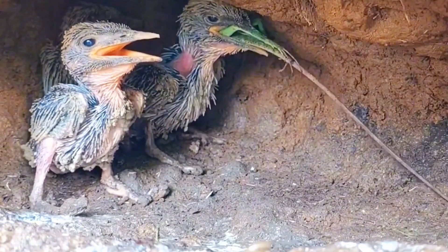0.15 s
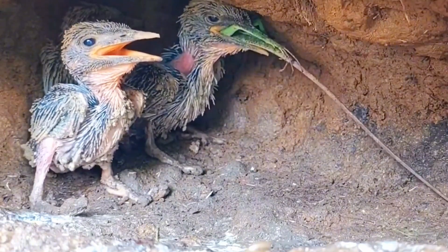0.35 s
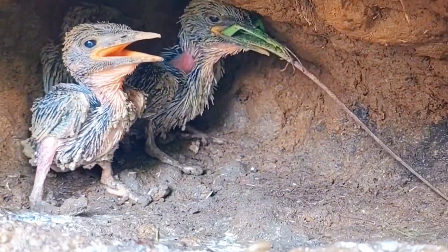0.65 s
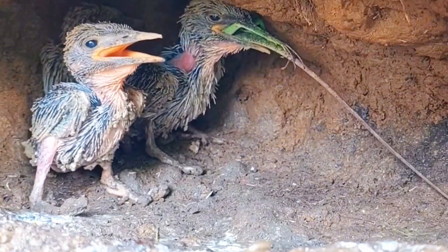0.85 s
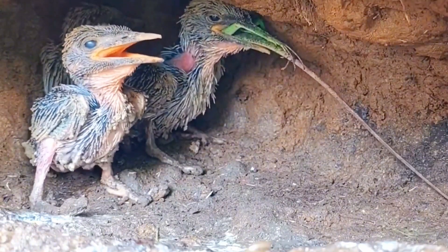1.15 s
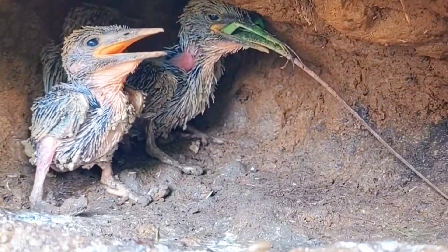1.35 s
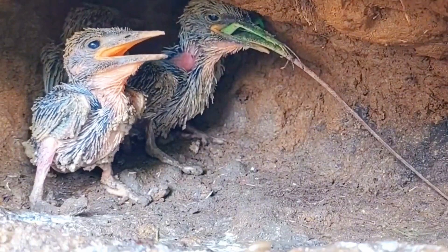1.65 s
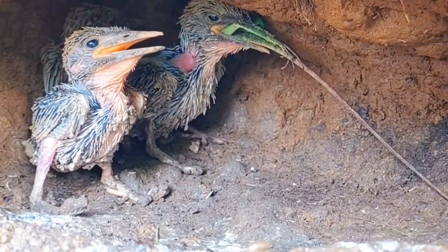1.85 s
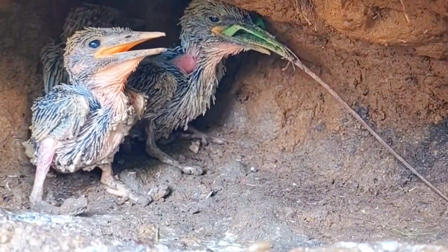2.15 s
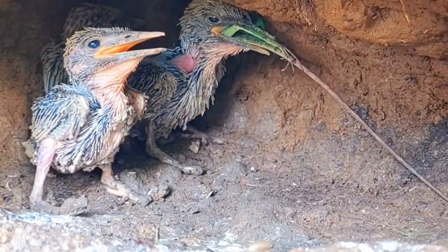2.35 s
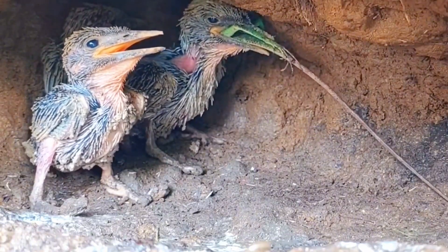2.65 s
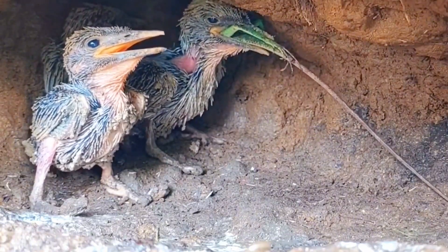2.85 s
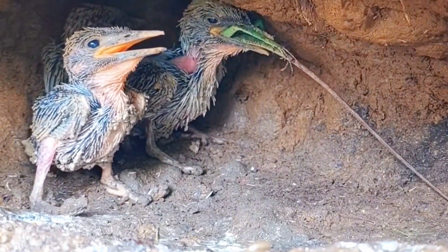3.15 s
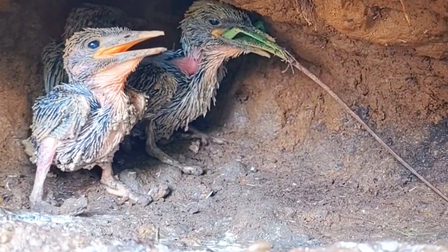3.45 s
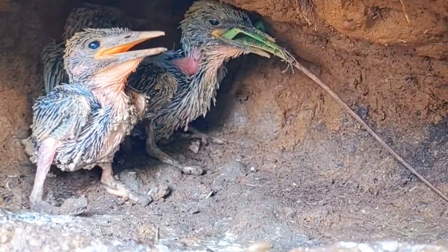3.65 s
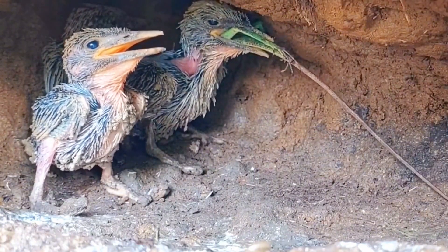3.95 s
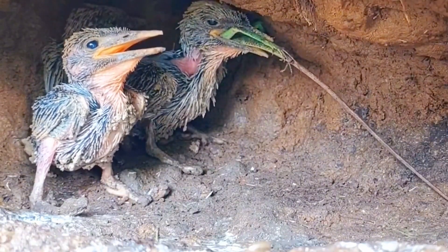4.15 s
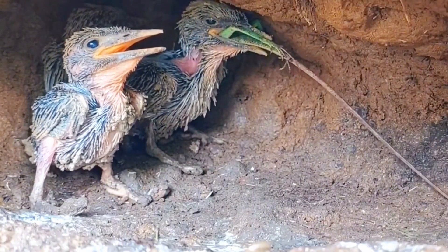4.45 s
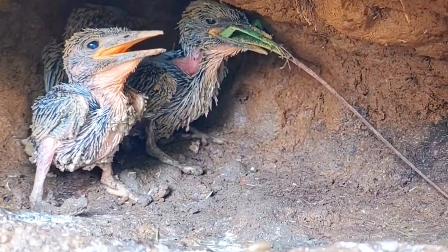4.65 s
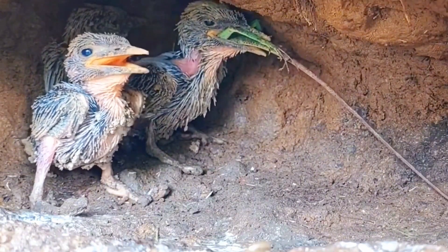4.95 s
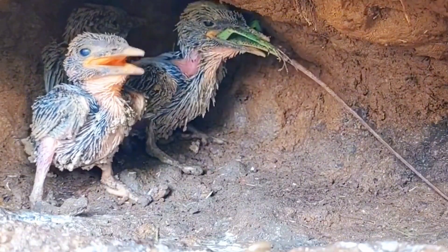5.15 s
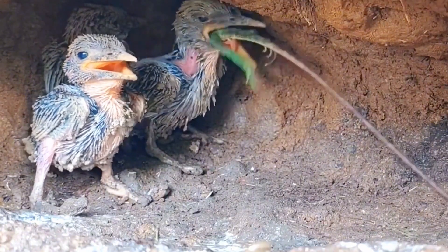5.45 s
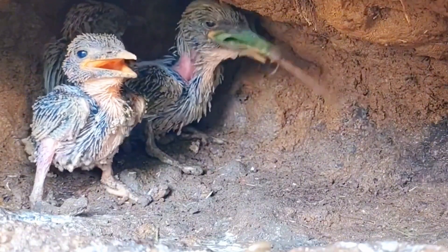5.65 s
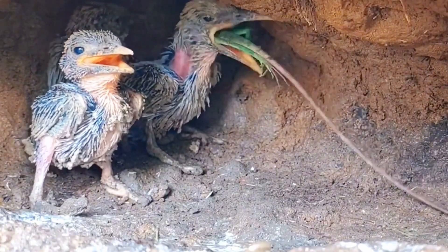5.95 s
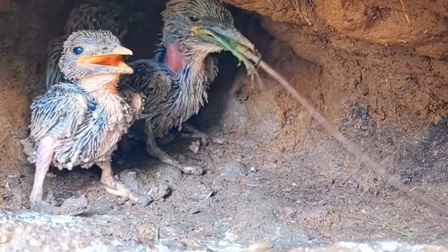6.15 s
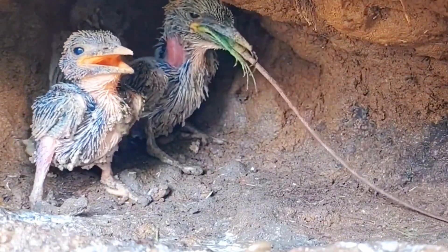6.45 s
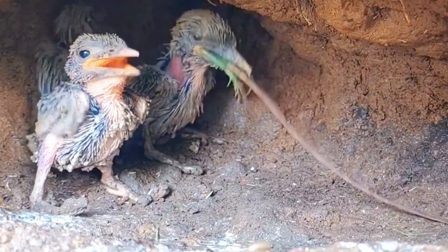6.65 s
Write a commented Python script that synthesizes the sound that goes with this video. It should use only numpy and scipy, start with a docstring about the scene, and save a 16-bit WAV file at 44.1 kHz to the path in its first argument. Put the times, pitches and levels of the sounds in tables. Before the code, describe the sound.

From the very start a nestling begs close by inside an earth burrow, giving about ten short, high, buzzing calls a second. Each call is a rough whistle that rises and falls slightly, mixed with an airy rasp and opened and closed by a soft tick. The near walls colour the sound and leave a short, weak ring. The rhythm is mostly even, but a few calls slur together at about 1.8 seconds, 4.8 seconds and 6.6 seconds. Just before 5 seconds the bird turns toward the listener and its voice becomes hoarser, carrying on at the same pace. Near 6.7 seconds the series ends in a harsh, hissy, rising screech about a tenth of a second long. A faint low rumble from outside fills the burrow the whole time.

```python
"""A faint rumble from outside fills an earth burrow throughout. From the start a nestling begs close by,
about ten short buzzing calls a second, now and then slurred together. In each call the syrinx pops open
with a soft tick, sounds a rough arched whistle under a rasp of turbulent air, and shuts with another tick;
near walls colour the sound, and a short, weak ring follows. Just before 5 s the bird turns to face the
listener and its voice grows hoarser. Near 6.7 s the series ends in a harsh, rising screech."""
import sys
import numpy as np
from scipy import signal
from scipy.fft import rfft, irfft, next_fast_len
from scipy.io import wavfile
from scipy.ndimage import uniform_filter1d, minimum_filter1d

SR = 44100
rng = np.random.default_rng(int(sys.argv[2]) if len(sys.argv) > 2 else 0)


def int16_out(signal):
    """Quantize to a 16-bit WAV file."""
    q = np.round(np.clip(np.atleast_2d(signal).T, -1, 1) * 32767)
    wavfile.write(sys.argv[1], SR, q.astype(np.int16))


N = 300762
TIME = np.arange(N) / SR
FREQS = np.fft.rfftfreq(N, 1 / SR)
USUAL_HZ, USUAL_LENGTH_S, USUAL_SPACING_S = 2780, 0.041, .095  # an ordinary call

# Levels in all tables are relative.
# spectrum of the rumble: (frequency [Hz], density [dB])
RUMBLE_SPECTRUM = [(33, -29.5), (48, 0), (62, -5), (82, -10.5), (105, -9.5), (135, 2), (165, -2),
                   (210, -17), (320, -15.5), (500, -32.5), (1500, -40.5), (5000, -32), (15000, -55.5)]
# drift of the whole rumble: (time [s], level [dB])
RUMBLE_LEVEL = [(0, -48.5), (.5, -45), (.8, -48), (2.4, -50.5), (3.4, -49.5), (6.8, -48.5)]
# swell of its deepest part: (time [s], gain [dB])
DEEP_SWELL = [(0, -1), (.7, -9), (2.2, -3), (3.2, 4), (4.2, 6), (5.1, 1), (6.8, 3)]
# the begging calls: (onset [s], length [s])
CALL_TIMES = [(0.023, 0.0453), (0.113, 0.0427), (0.213, .046), (.303, 0.0445), (0.392, .048),
              (0.483, 0.0428), (.572, .042), (0.668, .049), (.747, .048), (0.82, 0.04113), (.92, 0.0437),
              (1.013, 0.0442), (1.104, 0.0416), (1.187, 0.0428), (1.271, .043), (1.371, 0.0411),
              (1.465, 0.04286), (1.548, .042), (1.633, 0.037), (1.723, .056), (1.781, 0.06744),
              (1.837, .049), (1.943, 0.0443), (2.038, 0.045), (2.137, 0.04375), (2.234, 0.0428),
              (2.326, 0.04646), (2.413, 0.0409), (2.501, 0.0445), (2.6, 0.043), (2.693, 0.0428),
              (2.788, .044), (2.885, 0.042), (2.983, 0.04324), (3.083, 0.0436), (3.182, 0.0432),
              (3.283, 0.0419), (3.385, .046), (3.488, 0.044), (3.587, 0.044), (3.685, 0.0453),
              (3.784, 0.0464), (3.883, .042), (3.981, 0.0464), (4.082, .042), (4.169, 0.0419),
              (4.263, .046), (4.354, 0.0488), (4.452, 0.04206), (4.552, 0.046), (4.645, 0.0426),
              (4.723, 0.0611), (4.778, 0.0646), (4.84, 0.0538), (4.954, .047), (5.053, .048), (5.149, .046),
              (5.227, .042), (5.308, 0.0425), (5.408, 0.04435), (5.507, 0.0452), (5.607, 0.04524),
              (5.694, .043), (5.784, 0.0415), (5.878, 0.0452), (5.972, .045), (6.065, .042), (6.159, .043),
              (6.252, 0.043), (6.347, .046), (6.439, .047), (6.517, .041), (6.577, .06), (6.637, 0.048),
              (6.667, .039), (6.703, .064)]
# course of every call: (position [share of length], effort [dB], pitch [ratio])
CALL_ARCH = [(-.09, -32, .86), (-.02, -13, .915), (0.039, -1, .96), (.16, 1.5, 1.005), (0.349, -2, 1.025),
             (.62, -2, .985), (0.838, -4.5, .945), (1.0, -13.5, .94), (1.118, -25.5, 1.0),
             (1.281, -43.5, 1.02)]
# drift of the calls' base pitch: (time [s], frequency [Hz])
PITCH_DRIFT = [(0, 2764), (.25, 2830), (1.72, 2798), (1.78, 2688), (1.84, 2795), (2.04, 2710), (2.7, 2753),
               (3.1, 2705), (4.6, 2770), (4.9, 2866), (5.9, 2826), (6.25, 2746), (6.666, 2893), (6.7, 3067)]
# the longer the syrinx has been shut, the harder it pops open: (pause [s], level [dB])
OPENING_LEVEL = [(0, -60), (.034, -26.5), (.046, -24), (.056, -19.5)]
# tick of the syrinx opening or closing: (frequency [Hz], density [dB])
TICK_SPECTRUM = [(300, -24.5), (650, -34), (950, -7), (1400, -13.5), (2300, -9), (2900, 1.5), (3550, -14),
                 (5400, -24), (7000, -47), (15000, -45.5)]
# drift of the whistle: (time [s], level [dB])
WHISTLE_LEVEL = [(0, -8.5), (1.3, -8.5), (2.1, -8.5), (3.451, -7.5), (4.8, -7.5), (5.0, -9), (6.666, -9),
                 (6.7, -18)]
# response of the throat to the whistle: (frequency [Hz], gain [dB])
THROAT_RESPONSE = [(1900, -4.5), (2250, -14.5), (2450, -3), (2750, -2), (3100, 5), (3550, 0.5), (4200, 13),
                   (5500, -11)]
# the rasp, hoarser toward the end: (time [s], level [dB])
RASP_LEVEL = [(0, -28.5), (.8, -29.5), (1.15, -28), (1.63, -28), (1.78, -32), (2.0, -28), (2.45, -30.5),
              (4.75, -29), (4.95, -26), (6.25, -23.5), (6.7, -27)]
# the rasp with the beak side-on: (frequency [Hz], density [dB])
RASP_SPECTRUM = [(200, -21.5), (500, -15.5), (650, -15), (900, -1), (1700, 0), (2150, 3), (2800, 10.5),
                 (3500, 7.5), (4300, -2.5), (6000, -6), (8000, -8.5), (9700, -15), (11000, -31.5),
                 (13500, -18), (15400, -24.5)]
# its change once the beak faces the listener: (frequency [Hz], gain [dB])
FACING_RESPONSE = [(2500, -3), (5500, 0.5), (7500, -6), (9400, -14), (10700, 3), (15000, 5.5)]
# peaks and dips of the burrow: (centre [Hz], width [Hz], left gain [dB], right gain [dB])
BURROW_BANDS = [(770, 290, 1, -10), (1316, 363, -2.5, -7.5), (1744, 290, 4, 5), (1908, 195, -19.5, 2),
                (2420, 300, -3, 4.5), (3268, 150, -7, -18.5), (3574, 130, -5, 4), (4220, 160, -1, -1),
                (4273, 73, 14.5, -2), (4836, 120, 12, 8), (5096, 110, -12, 1.5), (5370, 580, 8, -6),
                (7060, 300, -1.5, 1.5), (9680, 860, -6.5, 8)]
# left-right likeness of noise between the walls: (frequency [Hz], coherence [0-1], left lead [rad])
BURROW_COHERENCE = [(550, 0.67, 0.6), (900, 0.78, -0.65), (1250, 0.73, -0.65), (1720, 0.82, -2.5),
                    (1900, .6, 0.4), (2020, .8, -1.35), (2500, 0.94, 0.3), (3000, 1, .25), (3330, 0.52, -3),
                    (3550, 0.64, 0.8), (4120, 0.47, 1.37), (5600, 0.38, 4), (6800, 0.53, 1.54),
                    (8030, 0.79, 3.5), (9100, 0.53, 1.83), (12500, .6, 1.1), (15000, .6, 2)]
# first echoes off the near walls: (channel [0 left, 1 right], delay [s], gain [ratio])
WALL_ECHOES = [(0, .00081, -.13), (0, .001195, -.18), (0, .001515, .12), (0, .002035, -.11),
               (1, .00078, .14), (1, .00099, -.13), (1, .00115, .16)]
# the short ring after each call: (frequency [Hz], time to fall 60 dB [s])
RING_DECAY = [(300, 0.21), (3600, 0.12), (4800, 0.2), (6300, 0.075)]
# course of the screech: (time [s], level [dB], main resonance [Hz])
SCREECH_COURSE = [(6.677, -34.5, 3454), (6.713, -22, 3570), (6.746, -19, 3930), (6.771, -19, 4210),
                  (6.784, -41, 4400), (6.79, -68, 4400)]
# its resonances: (centre [ratio to main resonance], half-width [Hz], level [dB])
SCREECH_RESONANCES = [(.46, 220, -16), (.97, 258, -1), (1.16, 237, -6)]
# its hiss: (frequency [Hz], density [dB])
HISS_SPECTRUM = [(500, -40), (1500, -11.5), (3000, 5.5), (4700, 7), (6000, 3), (9000, -1), (13000, -8),
                 (15500, -15.5)]


def amp(db):
    """Amplitude ratio of a level in decibels."""
    return 10 ** (np.asarray(db) / 20)


def unit(x):
    """Normalisation to rms 1."""
    return x / np.sqrt(np.mean(abs(x) ** 2) + 1e-20)


def read(points, hz=FREQS):
    """Interpolation of a table on a log-frequency axis."""
    f, value = np.transpose(points)
    return np.interp(np.log(hz + 1), np.log(f), value)


def shaped(x, db):
    """Zero-phase filtering by a gain in dB at each frequency."""
    return irfft(rfft(x) * amp(db), N)


def low_pass(x, hz, order=8):
    """Zero-phase filtering that keeps what lies below a frequency."""
    return irfft(rfft(x) / (1 + (FREQS / hz) ** order), N)


def flutter(hz):
    """Low-passed noise: random wavering up to a rate, rms 1."""
    size = next_fast_len(N, True)
    response = 1 / (1 + (np.fft.rfftfreq(size, 1 / SR) / hz) ** 4)
    return unit(irfft(rfft(rng.standard_normal(size)) * response, size)[:N])


def random_phasor(hz):
    """Random amplitude and phase modulation, which spreads a tone into a band."""
    return flutter(hz) + 1j * flutter(hz)


def noise_pair(db, coherence):
    """Partial coherence: left and right share part of a coloured noise."""
    left, independent = rfft(rng.standard_normal((2, N)))
    right = coherence * left + np.sqrt(np.maximum(1 - abs(coherence) ** 2, 0)) * independent
    return unit(irfft(np.array([left, right]) * amp(db), N))


def burrow_colour():
    """Interference between near earth walls: peaks and dips in dB for each channel."""
    return sum(np.array([[left], [right]]) * np.exp(-2 * ((FREQS - hz) / width) ** 2)
               for hz, width, left, right in BURROW_BANDS)


def burrow_coherence():
    """Complex coherence: likeness and phase between the channels at each frequency."""
    table = np.array(BURROW_COHERENCE)
    return np.clip(read(table[:, :2]), 0, 1) * np.exp(-1j * read(table[:, ::2]))


def rumble(gain_db=2, deep_hz=55):
    """Noise from outside; its long wavelengths arrive nearly alike at left and right."""
    coherence = read([(150, 0.99), (300, 0.99), (1000, 0.97), (4000, 0.39)])
    noise = noise_pair(read(RUMBLE_SPECTRUM), coherence)
    deep = low_pass(noise, deep_hz)
    noise = noise - deep + deep * amp(np.interp(TIME, *np.transpose(DEEP_SWELL)))
    return amp(gain_db + np.interp(TIME, *np.transpose(RUMBLE_LEVEL))) * noise


def calls(spacing_range_s=(.08, 0.096), rest_power=.12, spend_db_per_s=217, spend_max_db=1.53):
    """Effort and recovery, a row a call: a longer rest raises the pitch, a longer call is weaker."""
    onset, length = np.transpose(CALL_TIMES)
    hz, whistle_db, rasp_db = (np.interp(onset, *np.transpose(drift))
                               for drift in (PITCH_DRIFT, WHISTLE_LEVEL, RASP_LEVEL))
    spacing = np.diff(onset, prepend=onset[0] - USUAL_SPACING_S)
    hz = hz * (np.clip(spacing, *spacing_range_s) / USUAL_SPACING_S) ** rest_power
    pause = spacing - np.append(USUAL_LENGTH_S, length[:-1])
    opening_db = np.interp(pause, *np.transpose(OPENING_LEVEL))
    spent_db = np.minimum(spend_db_per_s * (length - USUAL_LENGTH_S), spend_max_db)
    return np.transpose([onset, length, hz, whistle_db - spent_db, rasp_db - .5 * spent_db, opening_db])


def ticks(lead_s=0.0083, after_s=0.00071, open_rise_s=0.0015, close_rise_s=0.0028,
          close_db=-29, close_spread_db=2.5, wall_share=0.93):
    """Transient excitation: a puff rings the throat as the syrinx opens, and again as it shuts."""
    gain = np.zeros(N)
    for (onset, length, *_, opening_db), chance in zip(calls(), rng.standard_normal(len(CALL_TIMES))):
        opens = (onset - lead_s, opening_db, open_rise_s)
        shuts = (onset + length + after_s, close_db + close_spread_db * chance, close_rise_s)
        for start, db, rise in [opens, shuts]:
            at = slice(int(start * SR), int(start * SR) + SR // 30)
            age = np.maximum(TIME[at] - start, 0) / (2 * rise)  # 1 at the puff's peak
            gain[at] += amp(db) * age * np.exp((1 - age ** 2) / 2)
    return gain * noise_pair(read(TICK_SPECTRUM) + wall_share * burrow_colour(), burrow_coherence())


def call_contours(rasp_follow=0.71, arch_power=2.995, arch_spread=.33):
    """Pitch and gains of the voice: overlapping calls add in power, and the stronger leads the pitch."""
    share, effort_db, bend = np.transpose(CALL_ARCH)
    pitch, whistle_gain, rasp_gain = np.full(N, 2700.), np.zeros(N), np.zeros(N)
    chances = rng.standard_normal(len(CALL_TIMES))
    for (onset, length, hz, whistle_db, rasp_db, _), chance in zip(calls(), chances):
        at = np.flatnonzero((TIME > onset + share[0] * length) & (TIME < onset + share[-1] * length))
        position = (TIME[at] - onset) / length
        effort = np.interp(position, share, effort_db)
        gain = amp(whistle_db + effort)
        arch_depth = (hz / USUAL_HZ) ** arch_power + arch_spread * chance  # higher calls arch more
        arched_hz = hz * np.interp(position, share, bend) ** arch_depth
        power_share = gain ** 2 / (gain ** 2 + whistle_gain[at] ** 2)
        pitch[at] += power_share * (arched_hz - pitch[at])
        whistle_gain[at] = np.hypot(whistle_gain[at], gain)
        rasp_gain[at] = np.hypot(rasp_gain[at], amp(rasp_db + rasp_follow * effort))
    return pitch, whistle_gain, rasp_gain


def throat_buzz(hz=310, spread=0.299):
    """An uneven oscillation, rms 1, for amplitude modulation of whistle and rasp."""
    rate = hz * (1 + spread * flutter(hz=147.9))
    return np.sqrt(2) * np.sin(2 * np.pi * np.cumsum(rate) / SR)


def head_turn(start_s=4.61, end_s=4.94):
    """Source orientation: 0 while the beak is side-on, 1 once it faces the listener."""
    return np.interp(TIME, [start_s, end_s], [0, 1])


def whistle(pitch, gain, buzz, wander=0.01105, jitter=0.01718, buzz_depth=0.19,
            scatter=0.68, scatter_hz=350, facing_cut=0.3, right_lag_s=.000004, wall_share=0.44):
    """Source and filter: the throat shapes the wavering syrinx tone; wall scattering roughens it."""
    hz = pitch * (1 + wander * flutter(hz=70.4) + jitter * flutter(hz=428))
    phase = 2 * np.pi * np.cumsum(hz) / SR
    echoes = np.array([random_phasor(scatter_hz) for _ in range(2)])
    # the tone comes more directly, and cleaner, once the beak faces the listener
    roughness = scatter * (1 - facing_cut * head_turn()) * unit(echoes + .5 * echoes[::-1])
    lag = np.exp(2j * np.pi * pitch * right_lag_s * np.array([[0], [-1]]))
    tone = unit((1 + buzz_depth * buzz + roughness) * lag) * np.exp(1j * phase)
    voice = np.sqrt(2) * gain * (tone + overtones(tone, phase, pitch)).real
    left_db = np.interp(head_turn(), [0, 1], [-1.2, .5])
    balance = amp(np.array([left_db, -left_db]))
    return shaped(voice * balance, read(THROAT_RESPONSE) + wall_share * burrow_colour())


def overtones(tone, phase, pitch, octave_db=-24, strain_db=-18, strain_power=13, strain_ratio=1.235):
    """A weak second harmonic, and an inharmonic band that flares when the pitch is pushed high."""
    octave = amp(octave_db) * tone * np.exp(1j * phase) * np.array([[1], [.5]])
    ragged_band = unit(random_phasor(hz=170)) * np.exp(1j * strain_ratio * phase)
    strain = np.minimum(pitch / 2900, 1.04) ** strain_power
    return octave + amp(strain_db) * strain * ragged_band


def rasp(gain, buzz, buzz_depth=0.15, gain_db=7, treble_hz=4800, treble_lag_s=0.0018):
    """Turbulence in the throat pulses with the buzz; directivity lifts its top as the beak turns."""
    side_on = noise_pair(read(RASP_SPECTRUM) + burrow_colour(), burrow_coherence())
    turn = head_turn()
    air = (1 - turn) * side_on + turn * shaped(side_on, read(FACING_RESPONSE))
    body = low_pass(air, treble_hz)
    pole = np.exp(-1 / (treble_lag_s * SR))
    treble_gain = signal.lfilter([1 - pole], [1, -pole], gain)  # builds and fades a little late
    pulsing = unit(np.exp(buzz_depth * buzz))
    return amp(gain_db) * pulsing * (gain * body + treble_gain * (air - body))


def near_walls(x):
    """Comb filtering: echoes a millisecond or two late interfere with the direct sound."""
    comb = np.ones((2, len(FREQS)), complex)
    for channel, delay, gain in WALL_ECHOES:
        comb[channel] += gain * np.exp(-2j * np.pi * FREQS * delay)
    return irfft(rfft(x) * comb, N)


def short_ring(x, wet_db=-27):
    """Exponential decay: a weak ring after each call lingers near 4.8 kHz, dies fastest above 6 kHz."""
    noise = rng.standard_normal((2, SR // 4))
    hz, t, spectra = signal.stft(noise, SR, nperseg=256)
    decay = amp(-60 * t / read(RING_DECAY, hz)[:, None])
    tail = signal.istft(spectra * decay, SR, nperseg=256)[1]
    wet = signal.fftconvolve(x, tail / np.linalg.norm(tail[0]), axes=1)[:, :N]
    colour_db = read([(1500, 5.9), (2750, -3), (4800, 9.5), (7000, 4.5), (13000, 10)])
    return shaped(wet, wet_db + colour_db)


def screech(hiss_db=-3):
    """Narrow-band noise: the ragged resonances of a harsh cry rise together in broad hiss."""
    times, db, hz = np.transpose(SCREECH_COURSE)
    phase = 2 * np.pi * np.cumsum(np.interp(TIME, times, hz)) / SR
    bands = np.zeros((2, N))
    for ratio, width, band_db in SCREECH_RESONANCES:
        phasors = np.array([random_phasor(width) for _ in range(2)])
        bands += amp(band_db) * (phasors * np.exp(1j * ratio * phase)).real
    hiss = noise_pair(read(HISS_SPECTRUM), burrow_coherence())
    envelope = amp(np.interp(TIME, times, db, left=-120, right=-120))
    return envelope * (bands + amp(hiss_db) * hiss)


def scene():
    """Superposition of the bird between near walls, a short ring and the rumble from outside."""
    pitch, whistle_gain, rasp_gain = call_contours()
    buzz = throat_buzz()
    bird = near_walls(whistle(pitch, whistle_gain, buzz) + rasp(rasp_gain, buzz) + ticks() + screech())
    return bird + short_ring(bird) + rumble()


def record(dry, ceiling=0.89, drive_db=1.5, cutoff_hz=15600):
    """Peak limiting holds down the loudest calls; a low-pass filter then limits the bandwidth."""
    driven = dry * amp(drive_db)
    allowed = np.minimum(1, ceiling / (abs(driven) + 1e-9))
    held = minimum_filter1d(allowed, size=61, axis=1)
    gain = uniform_filter1d(held, size=61, axis=1)
    band_limit = signal.firwin(401, cutoff_hz, window=("kaiser", 9), fs=SR)
    return signal.oaconvolve(driven * gain, band_limit[None], "same")


dry = scene()
out = record(dry)
int16_out(out)
```